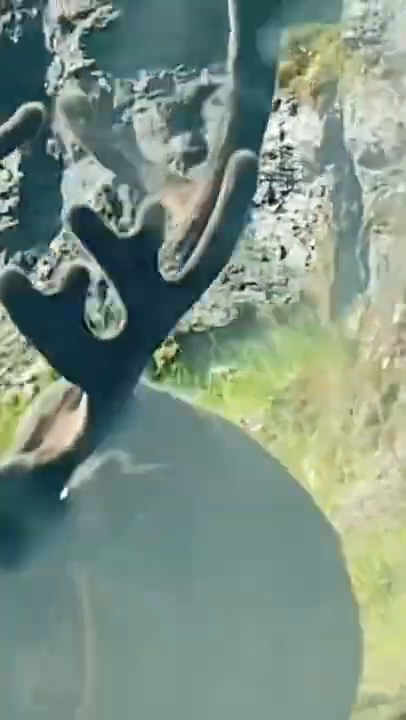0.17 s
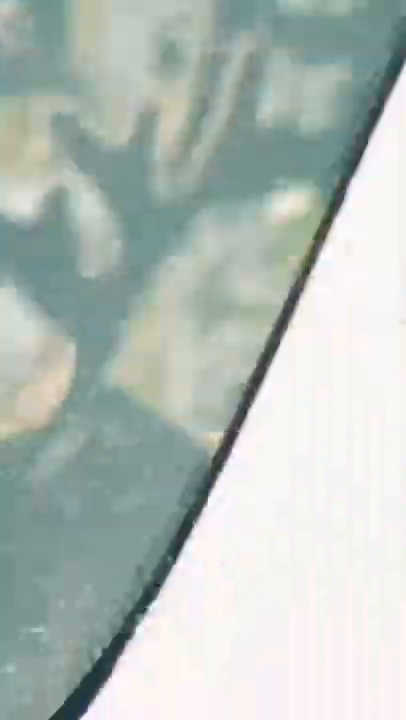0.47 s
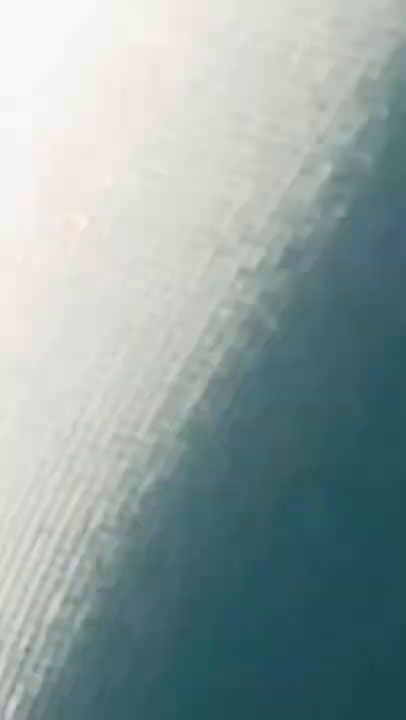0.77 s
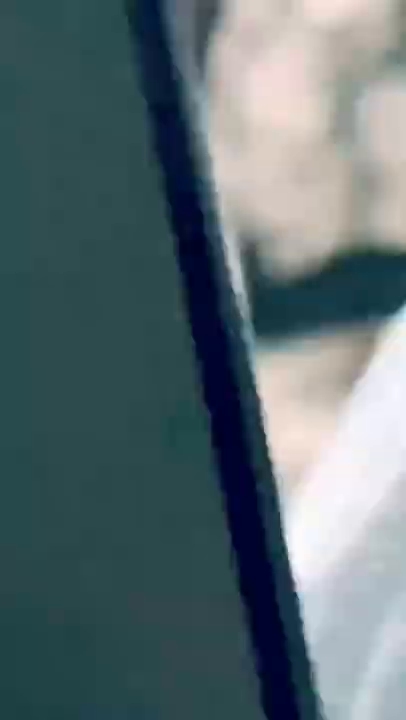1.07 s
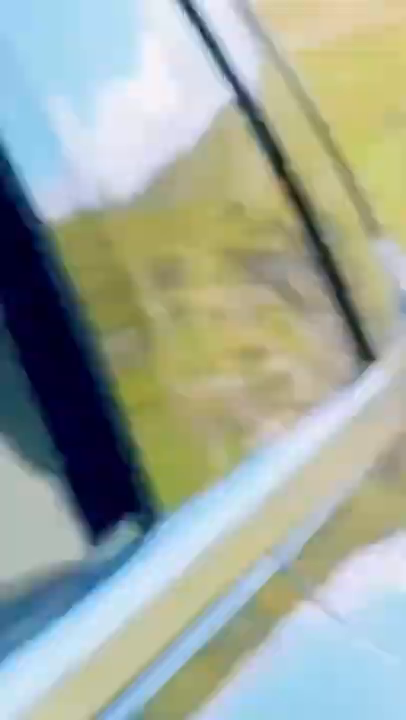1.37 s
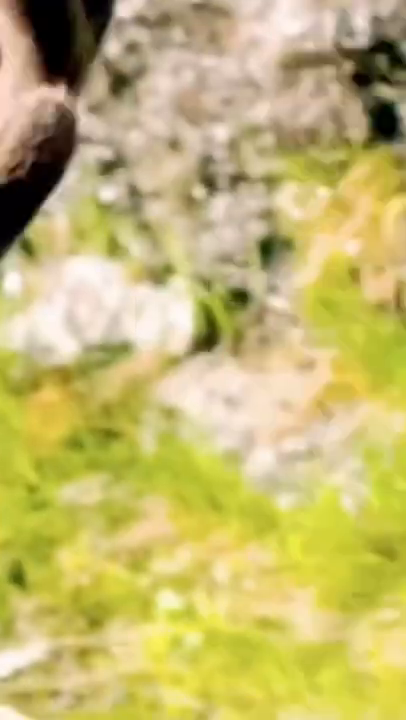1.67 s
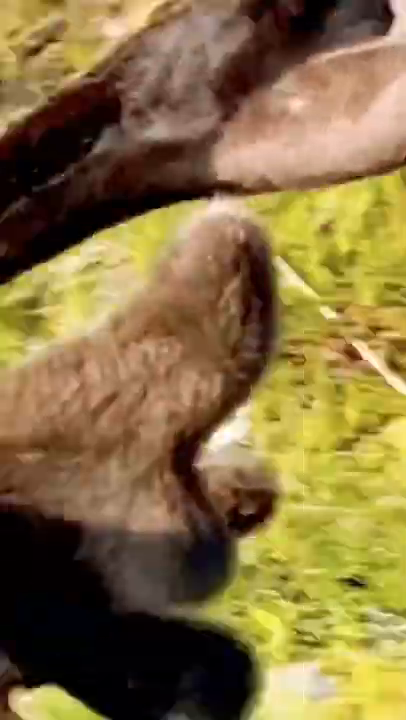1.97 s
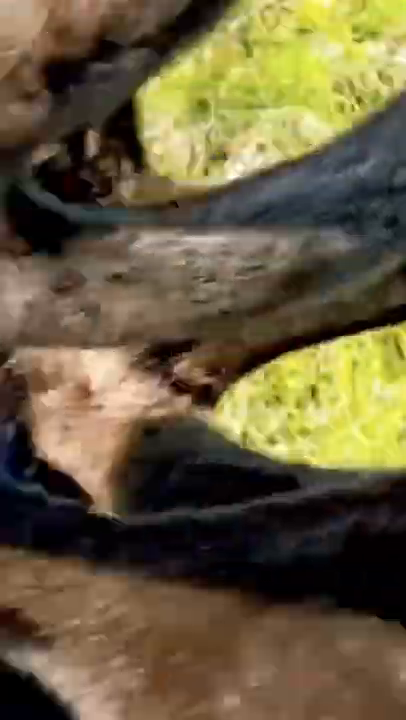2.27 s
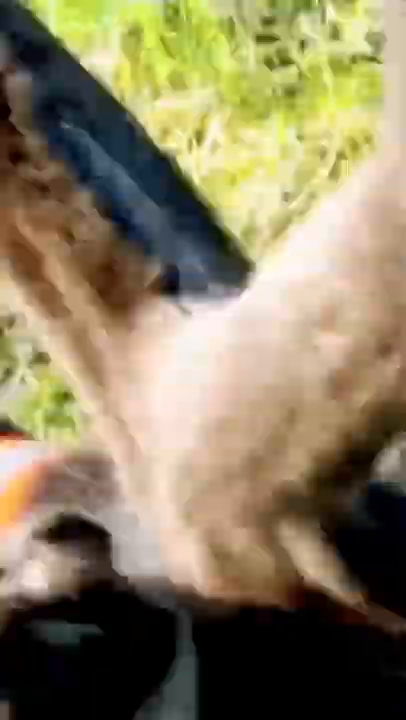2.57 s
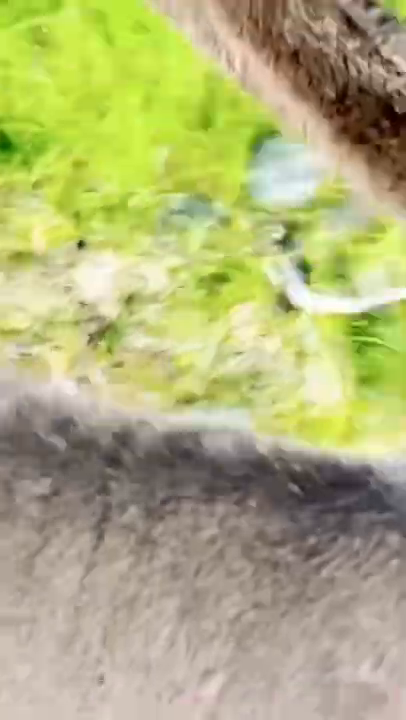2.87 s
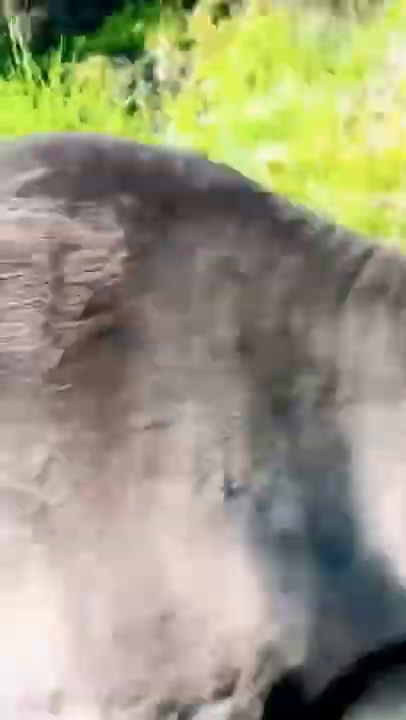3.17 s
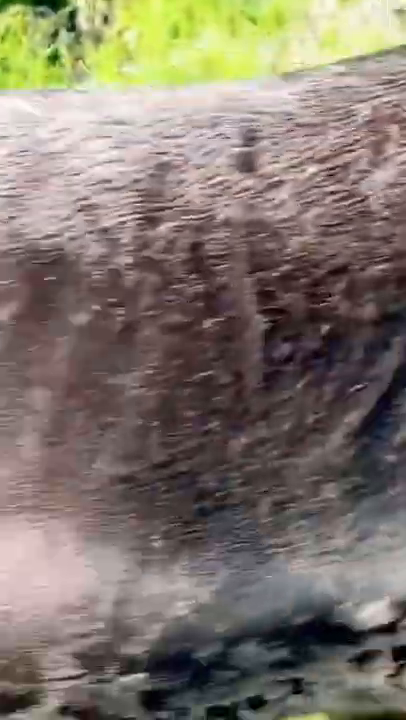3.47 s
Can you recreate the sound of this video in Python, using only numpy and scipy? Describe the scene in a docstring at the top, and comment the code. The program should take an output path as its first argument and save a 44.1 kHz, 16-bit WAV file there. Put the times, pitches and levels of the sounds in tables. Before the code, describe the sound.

Sharp clicks and soft knocks of walking reindeer over a low engine idle.

```python
"""Reindeer walk past a stopped car: their feet click sharply, and their hooves scuff, crackle on grit
and knock softly on the asphalt. The engine idles, each firing giving a low throb and a burst of clatter
that rings the body panels; near the end a rough buzz swells and fades. The microphone moves from the
cabin out of the side window, where the rumble calms and the clatter and outdoor hiss open up."""
import sys
import numpy as np
from scipy import signal
from scipy.fft import rfft, irfft, next_fast_len
from scipy.io import wavfile
from scipy.ndimage import uniform_filter1d, map_coordinates

SR = 44100
rng = np.random.default_rng(int(sys.argv[2]) if len(sys.argv) > 2 else 0)


def master(y):
    """Save y as 16-bit WAV."""
    cut = np.clip(np.atleast_2d(y).T, -1, 1)
    pcm = np.round(cut * 32767)  # scale
    wavfile.write(sys.argv[1], SR, pcm.astype(np.int16))


N = 160083

# loudness as the microphone moves outside: t/s, cabin drone/dB, engine clatter/dB, outdoor hiss/dB
CABIN_TO_OUTSIDE = [(0, -47.5, -66.5, -70), (1.2, -48, -63, -71), (1.75, -49, -59.5, -66),
                    (2.1, -50.5, -57, -63.5), (2.6, -48.5, -53, -62), (3.05, -50.5, -52, -60.5),
                    (3.63, -49, -51.5, -58.5)]
# tone of grit under a hoof: f/Hz, relative level/dB
GRIT_TONE = [(1000, -3), (3000, 1.5), (6000, 4), (10500, 3), (13000, -6), (16000, -17)]
CLATTER_OFFSET = -.16  # in firing cycles: the clatter comes just before the throb


def amp(db):
    """Turn decibels into a gain."""
    return 10 ** (np.asarray(db) / 20)


def unit(x):
    """Scale a signal to an average (rms) level of 1."""
    return x / np.sqrt(np.mean(x ** 2) + 1e-20)


def along(points, hz):
    """Read between (frequency, value) points on a log frequency axis."""
    freqs, values = np.transpose(points)
    return np.interp(np.log(hz + 1), np.log(freqs + 1), values)


def curves(rows):
    """Give one value per sample for each column after the time."""
    times, *columns = np.transpose(rows)
    return [np.interp(np.arange(N) / SR, times, column) for column in columns]


def wobble(rate):
    """A smooth random curve through `rate` points a second."""
    return map_coordinates(rng.standard_normal(int(N * rate / SR) + 4), [np.arange(N) * rate / SR])


def filtered(x, response):
    """Filter x; response(hz) gives the gain and phase at each frequency."""
    size = next_fast_len(N + SR // 2)
    return irfft(rfft(x, size) * response(np.fft.rfftfreq(size, 1 / SR)), size)[..., :N]


def stereo_noise(tone, patchy_db):
    """Noise with the given tone and short patches that are randomly louder or softer."""
    # how alike left and right are: f/Hz, likeness/0-1
    likeness = [(100, 0.98), (200, 0.79), (400, 0.31), (850, 0), (1300, 0.66), (2100, 1), (3500, 0.95),
                (7000, 1), (12000, 0.73)]
    spectra = signal.stft(rng.standard_normal((2, N)), nperseg=512)[2]
    patches = uniform_filter1d(rng.standard_normal(spectra.shape[1:]), size=5, axis=0)
    patches = unit(uniform_filter1d(patches, size=5, axis=1))
    pair = signal.istft(spectra * amp(patchy_db * patches), nperseg=512)[1][:, :N]

    def tone_and_width(hz):
        angle = np.arccos(np.clip(along(likeness, hz), -1, 1)) / 2
        return amp(along(tone, hz)) * np.array([np.cos(angle), np.sin(angle)])
    mid, side = filtered(pair, tone_and_width)
    return unit(np.array([mid + side, mid - side]))


def shortest_pulse(gain_db, size):
    """The most compact pulse that has this spectrum (minimum phase)."""
    cepstrum = irfft(np.log(amp(gain_db)))
    fold_forward = np.r_[1, np.full(size // 2 - 1, 2), 1, np.zeros(size // 2 - 1)]
    return irfft(np.exp(rfft(cepstrum * fold_forward)))


def add(track, start_s, sound):
    """Mix a sound into a track at the given time."""
    part = track[..., round(start_s * SR):][..., :sound.shape[-1]]
    part += sound[..., :part.shape[-1]]


def air():
    """Air rumbles against the moving microphone, and the outdoors hisses."""
    # strength of the rumble: t/s, level/dB
    rumble_levels = [(0,-35.5),(.1,-32),(.18,-37.5),(.26,-32),(.37,-35.5),(.51,-31),(.58,-33.5),(.66,-29),(.74,-35.5),(.84,-35),(1.05,-36.5),(1.23,-39),(1.35,-37),(1.46,-42),(1.54,-33.5),(1.62,-34.5),(1.69,-45),(2.4,-40),(2.68,-44),(2.73,-31),(2.78,-42),(2.88,-43),(2.96,-32.5),(3.05,-42),(3.63,-39.5)]
    # tones of the rumble and the hiss: f/Hz, relative level/dB
    rumble_tone = [(12, -7), (22, -18), (32, 3), (50, -6.5), (85, 4.5), (105, -4.5), (150, -19), (300, -31),
                   (900, -95)]
    hiss_tone = [(300, 4), (1500, 14.5), (3100, -5), (3600, 8.5), (4200, 6.5), (5500, 3), (8600, 0.5),
                 (11500, -1.5), (13200, -19), (15700, -23)]
    hiss_db = curves(CABIN_TO_OUTSIDE)[2] + .5 * wobble(16)
    rumble = stereo_noise(rumble_tone, patchy_db=0)
    power = uniform_filter1d(np.mean(rumble ** 2, axis=0), size=SR // 16)
    rumble /= np.sqrt(np.abs(power) + 1e-9)  # even out the noise's own swells
    hiss = stereo_noise(hiss_tone, patchy_db=1.3)
    return amp(curves(rumble_levels)[0]) * rumble + amp(hiss_db) * hiss


def firing_pulses(cycle, swing_db, scatter_db, scatter_rate):
    """A gain that rises and falls once per engine firing, a little unevenly."""
    return unit(amp(swing_db * np.cos(2 * np.pi * cycle) + scatter_db * wobble(scatter_rate)))


def exhaust_throb(cycle):
    """The exhaust hums at multiples of the firing rate; the cabin booms at three times that rate."""
    # tones in the throb: multiple of the firing rate, level/dB
    harmonics = [(1, -43.5), (2, -42.5), (3, -45.5), (4, -57.5), (5, -61.5), (6, -61.5), (7, -65.5),
                 (9, -68)]
    # cabin boom: t/s, added level/dB
    boom = [(0, -5.5), (.7, -4), (1.2, -6.5), (1.6, 1), (1.9, -4), (3.63, 0.5)]
    boom_db, throb = curves(boom)[0], np.zeros(N)
    for multiple, db in harmonics:
        gain = amp(db + (multiple == 3) * boom_db + .2 * wobble(8.7))
        throb += np.sqrt(2) * gain * np.cos(2 * np.pi * multiple * cycle)
    return throb


def panel_ring(cycle):
    """Every firing taps the car's body panels, never quite alike, and they ring."""
    # notes of the panels: f/Hz, width/Hz, relative level/dB
    notes = [(566,31,-4.5),(887,34,4.5),(978,13.6,0),(1430,16,-4.5)]
    # strength of the ringing: t/s, level/dB
    ring_levels = [(0,-70),(2.1,-68),(2.7,-60),(3.0,-56.5),(3.16,-64),(3.63,-58)]
    jitter_s, scatter_db = .00014, 1.5
    taps = np.zeros(N)
    for sample in np.flatnonzero(np.diff(np.floor(cycle - CLATTER_OFFSET))):
        late, strength = rng.standard_normal(2)
        add(taps, abs(sample / SR + jitter_s * late), amp([scatter_db * strength]))

    def panels(hz):
        return sum(amp(db) * 1j * hz * width / (pitch ** 2 - hz ** 2 + 1j * hz * width)
                   for pitch, width, db in notes)
    return amp(curves(ring_levels)[0]) * unit(filtered(taps, panels))


def buzz(cycle):
    """A rough tone flares up once a firing and sinks in pitch as it swells and fades."""
    # course of the buzz: t/s, f/Hz, level/dB
    course = [(2.7,992,-68),(2.8,991,-60),(2.89,947,-55),(3.0,915,-57.5),(3.05,891,-51.5),(3.115,892,-50),(3.15,884,-58),(3.25,873,-78)]
    hz, db = curves(course)
    pulses = firing_pulses(cycle - .023, swing_db=6.5, scatter_db=1.5, scatter_rate=120)
    roughness = .12 * wobble(220) + .22 * wobble(40)
    tone = np.sqrt(2) * np.sin(2 * np.pi * (np.cumsum(hz) / SR + roughness))
    started = np.arange(N) / SR > course[0][0]
    return amp(db) * pulses * tone * started


def engine():
    """Each firing of the idling engine throbs and clatters; the cabin drones along."""
    # idle speed: t/s, firing rate/Hz
    idle = [(0, 30.55), (.6, 30.55), (1.2, 31.28), (2.4, 31.41), (3.63, 31.28)]
    # tones of the clatter and the cabin drone: f/Hz, relative level/dB
    clatter_tone = [(200, -23), (550, 5), (750, -2), (1000, 4), (1400, -2.5), (1800, -7.5), (2150, -6),
                    (2550, -4.5), (2850, -8), (3150, -4), (3600, -14.5), (4400, -13), (7000, -25.5),
                    (14000, -32)]
    drone_tone = [(60, -15), (130, 4), (200, -5.5), (290, -3.5), (480, -8), (570, -4.5), (750, -15),
                  (1300, -22.5), (1900, -23), (2900, -33.5), (3150, -25.5), (3420, -37), (8000, -67)]
    cycle = .2 + np.cumsum(curves(idle)[0]) / SR  # counts up by one per firing
    drone_db, clatter_db, _ = curves(CABIN_TO_OUTSIDE)
    throb = exhaust_throb(cycle)
    bursts = firing_pulses(cycle - CLATTER_OFFSET, swing_db=3.5, scatter_db=1.6, scatter_rate=60)
    clatter = amp(clatter_db) * bursts * stereo_noise(clatter_tone, patchy_db=2)
    ringing = panel_ring(cycle) + buzz(cycle)
    drone = amp(drone_db) * stereo_noise(drone_tone, patchy_db=1.5)
    return throb + clatter + ringing + drone


def grit_crackle():
    """Grit ticks under the herd's feet, growing louder along with the outdoor hiss."""
    grains_per_s, spread_db, below_hiss_db = 700, 4.5, 11
    grains = (rng.random(N) < grains_per_s / SR) * rng.choice([-1, 1], N)
    grains = grains * amp(spread_db * rng.standard_normal(N))
    ticks = unit(filtered(grains, lambda hz: amp(along(GRIT_TONE, hz))))
    return amp(curves(CABIN_TO_OUTSIDE)[2] - below_hiss_db) * ticks


def hoof_scuffs():
    """Hooves brush over grit in short grainy swells."""
    # each scuff at its peak: t/s, length/s, level/dB
    scuffs = [(.19, 0.022, -66.5), (0.283, 0.043, -70), (.642, 0.026, -65.5), (.71, .05, -73),
              (0.846, 0.056, -74.5), (1.24, 0.029, -67), (1.606, 0.016, -67), (1.901, 0.02, -58),
              (2.02, 0.13, -68), (2.134, 0.015, -56.5), (2.182, 0.032, -58), (2.454, 0.026, -59.5),
              (2.596, 0.04, -61), (2.658, 0.18, -64.5), (3.15, 0.012, -53)]
    t = np.arange(N) / SR
    swells = sum(amp(db) * np.exp(-2 * ((t - peak_s) / length) ** 2) for peak_s, length, db in scuffs)
    graininess = amp(2 * wobble(900))
    return swells * unit(graininess * stereo_noise(GRIT_TONE, patchy_db=1.5))


def hoof_knocks(size=4096):
    """A landing hoof knocks, its pitch dropping as it settles, with a light scrape and a dull thud."""
    # each knock: t/s, relative ring level/dB, f/Hz, thud level/dB, scrape level/dB
    knocks = [(.829,-50,2300,-38,-49.5),(2.43,-38,1120,-46,-57),(2.5145,-30.5,860,-31,-44.5),(2.69,-36,750,-55,-55),(2.914,-35,624,-50,-46),(3.073,-34,650,-54,-44),(3.238,-38,1338,-58,-46),(3.2995,-29,1396,-58,-40.5),(3.4819,-23,1795,-41,-41.5)]
    # notes of a hoof: multiple of its pitch, relative level/dB, time to fade by 60 dB/s
    hoof_notes = [(.83, -8.5, 0.014), (1, -1, 0.013), (1.13, 2, 0.011), (1.6, -22, 0.011)]
    # notes of the thud from the animal's weight: f/Hz, relative level/dB, time to fade by 60 dB/s
    thud_notes = [(87,1.5,0.13),(256,-3,0.039),(435,-2,0.022)]
    # tone of the scrape: f/Hz, relative level/dB
    scrape_tone = [(300,-6),(1100,1.5),(2200,3),(2650,-9),(3100,1.5),(3800,-8),(7000,-17),(16000,-50)]
    pitch_drop, settle_s, attack_s, scrape_fade_s = .21, .0035, .0021, .034
    out, t = np.zeros(N), np.arange(size) / SR
    slowing_time = np.cumsum(1 - pitch_drop * (1 - np.exp(-t / settle_s))) / SR
    attack = 1 - np.exp(-(t / attack_s) ** 2)
    thud = sum(amp(db - 60 * t / fade_s) * np.sin(2 * np.pi * hz * t) for hz, db, fade_s in thud_notes)
    scrape_filter = amp(along(scrape_tone, np.fft.rfftfreq(size, 1 / SR)))
    for start_s, ring_db, hz, thud_db, scrape_db in knocks:
        ring = np.zeros(size)
        for ratio, db, fade_s in hoof_notes:
            cycles = hz * ratio * slowing_time + .04 * rng.standard_normal()
            ring += amp(db - 60 * t / fade_s) * np.sin(2 * np.pi * cycles)
        noise = unit(irfft(rfft(rng.standard_normal(size)) * scrape_filter))
        scrape = amp(scrape_db - 60 * t / scrape_fade_s) * noise
        add(out, start_s, attack * (amp(ring_db + 5.5) * ring + scrape + amp(thud_db) * thud))
    return out


def foot_clicks(size=4096):
    """A dry snap in the foot: one sharp pulse, a brief crackle and faint echoes off road and car."""
    # each click: t/s, relative level/dB, brightness/dB per octave, boosted f/Hz
    clicks = [(.163,-47,2,6000),(.246,-46,3,4800),(.415,-51,-3,6800),(.6134,-44,3,4200),(1.2079,-36,1.5,3150),(1.475,-51,6,6500),(1.7253,-45.5,1,6500),(1.872,-38.5,3,3100),(2.2166,-28.5,4,6070),(2.4852,-25,3,4600),(2.5354,-34.5,2,4770),(2.7485,-27,2.5,6400),(2.903,-24,3,4170),(2.9633,-37.5,2.5,4800),(3.1507,-48,13,4800),(3.239,-24,4,4580)]
    # tone all clicks share: f/Hz, relative level/dB
    click_tone = [(500,-24),(2300,-8),(3100,-3.5),(4200,1),(5200,-3),(6200,-1.5),(7600,-1.5),(11000,-6.5),(13000,-14.5),(16000,-23)]
    snap_fade_s, echo_fade_s, echo_db = .011, .055, -19.5
    boost_db, boost_octaves = 5, .27
    out, t, hz = np.zeros((2, N)), np.arange(size) / SR, np.fft.rfftfreq(size, 1 / SR)
    for start_s, db, brightness, peak_hz in clicks:
        snap = rng.standard_normal(size) * amp(-60 * t / snap_fade_s)
        snap[0] += 4  # the sharp pulse
        echoes = rng.standard_normal((3, size)) * amp(echo_db - 60 * t / echo_fade_s)
        click = (snap + echoes[0] + echoes[1:]) / np.linalg.norm(snap)  # echoes: shared, left, right
        ripple_db = 10 * np.log10(uniform_filter1d(np.abs(rfft(click[0])) ** 2, size=90))
        peak_db = boost_db * np.exp(-(np.log2((hz + 1) / peak_hz) / boost_octaves) ** 2)
        tilt_db = brightness * np.log2((hz + 200) / 6000)
        tone_db = along(click_tone, hz) + peak_db + tilt_db
        pulse = shortest_pulse(tone_db - .6 * ripple_db, size)  # partly smooth out random bumps in tone
        add(out, start_s, amp(db + 13.5) * signal.fftconvolve(click, pulse[None], axes=1))
    return out


def scene():
    """The idling car and the air, with the reindeer walking past."""
    return engine() + air() + foot_clicks() + hoof_scuffs() + grit_crackle() + hoof_knocks()


def record(dry):
    """The microphone's two openings differ in level and phase; the highest treble is cut off."""
    # how much louder the left side is: f/Hz, level/dB
    balance = [(60, -1.7), (250, -1.3), (1200, -1), (2200, 0)]
    # how far the left side is ahead: f/Hz, phase/radians
    left_lead = [(200, 0), (600, .8), (1400, -.15), (2200, 0), (3100, .5), (4800, .5), (6000, -.1),
                 (7800, 0), (8100, 2), (9000, 1.95), (11000, 0), (13400, -3.14), (14200, -3.9),
                 (15300, -6.1)]
    fade_s, top_hz = .003, 16000
    sides = np.array([[.5], [-.5]])  # half to the left, the opposite half to the right

    def microphone(hz):
        phase = np.interp(hz, *np.transpose(left_lead))
        return amp(sides * along(balance, hz)) * np.exp(1j * sides * phase) * (hz < top_hz)
    from_edge_s = np.minimum(np.arange(N), np.arange(N)[::-1]) / SR
    return filtered(dry * np.minimum(from_edge_s / fade_s, 1), microphone)


dry = scene()
out = record(dry)
master(out)
```